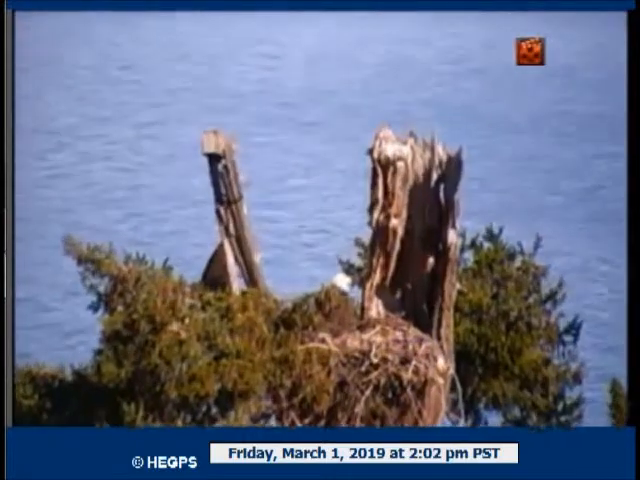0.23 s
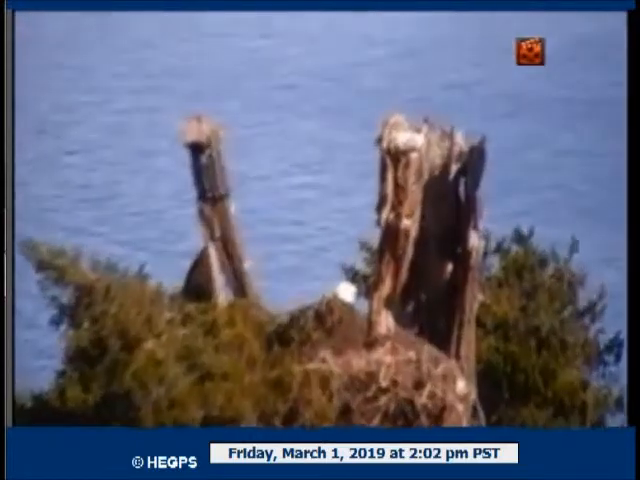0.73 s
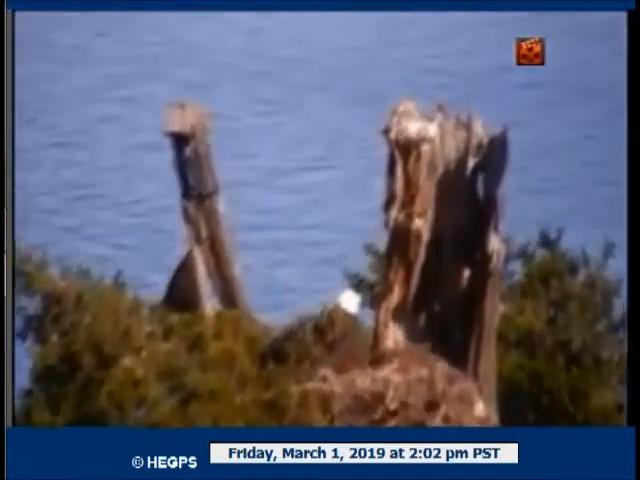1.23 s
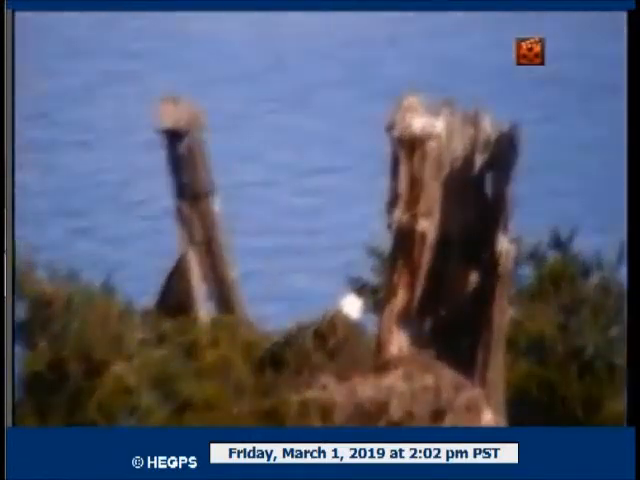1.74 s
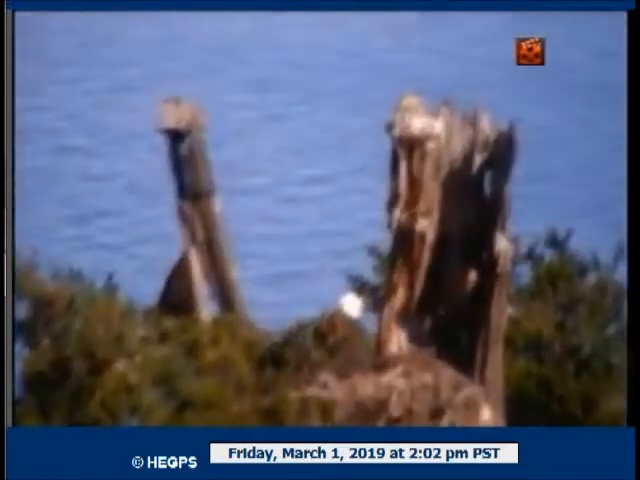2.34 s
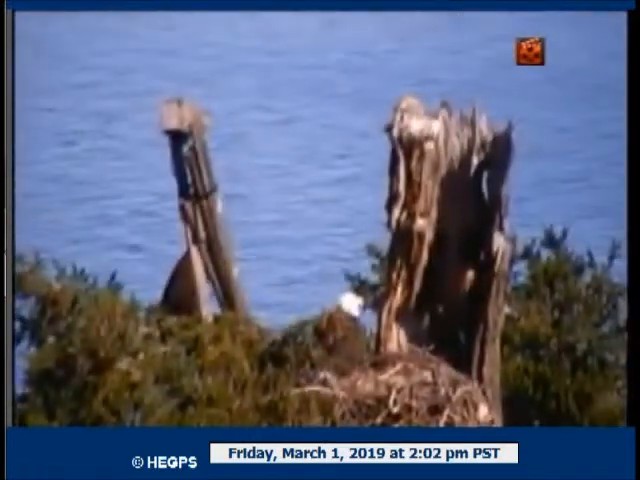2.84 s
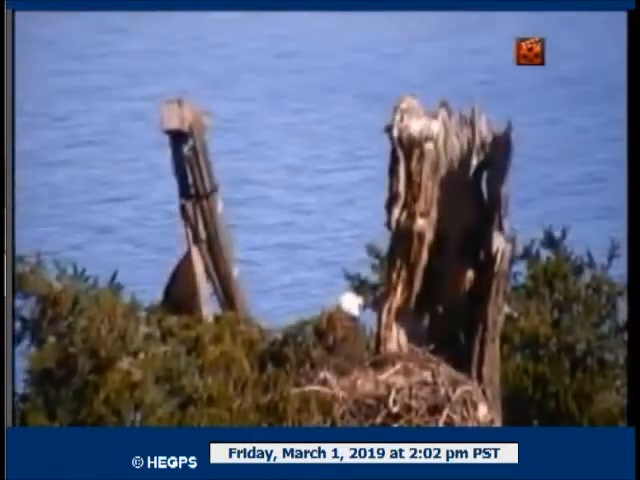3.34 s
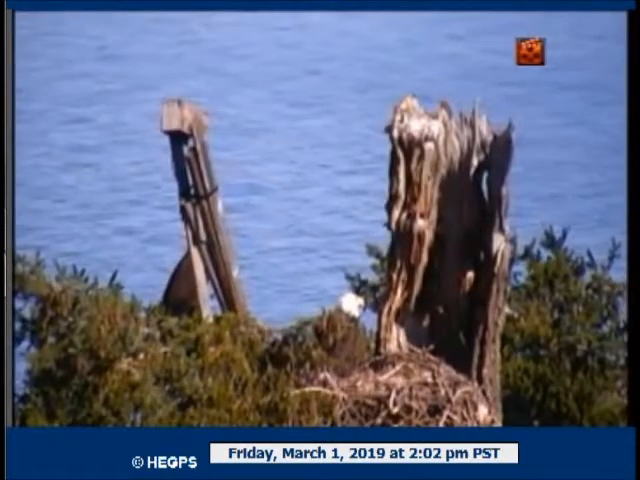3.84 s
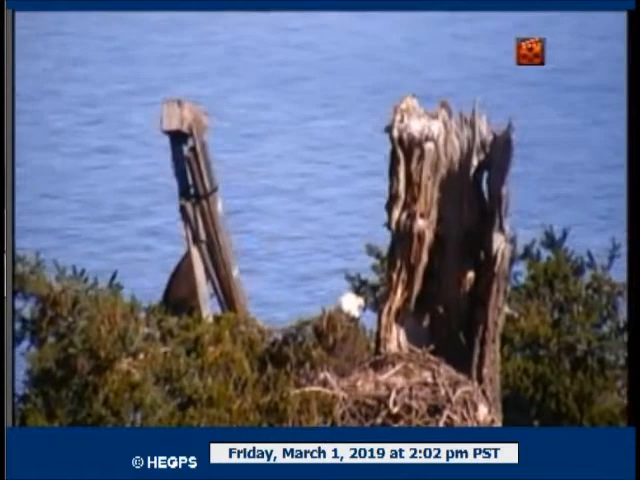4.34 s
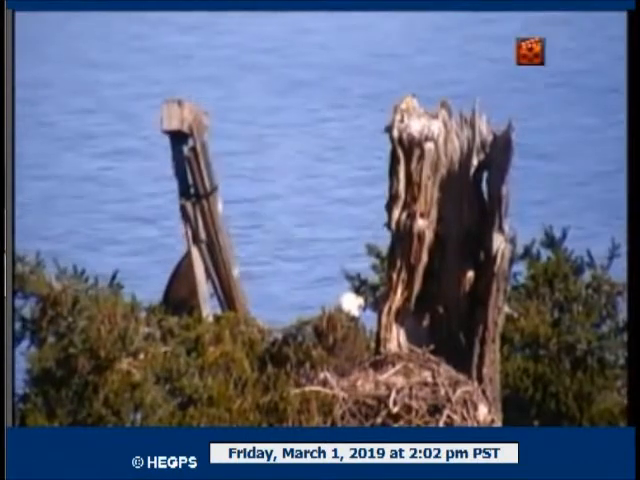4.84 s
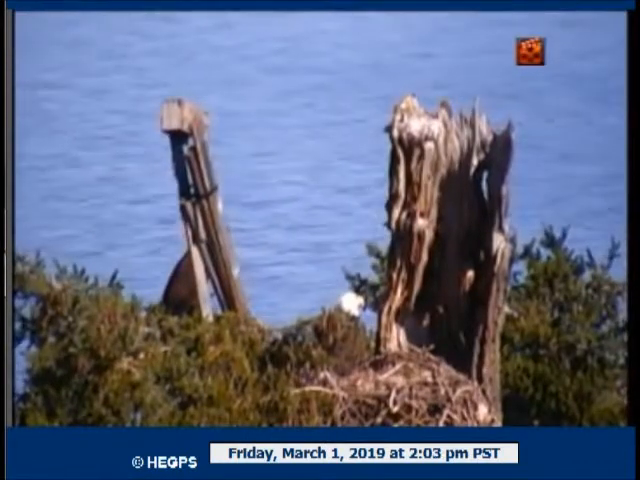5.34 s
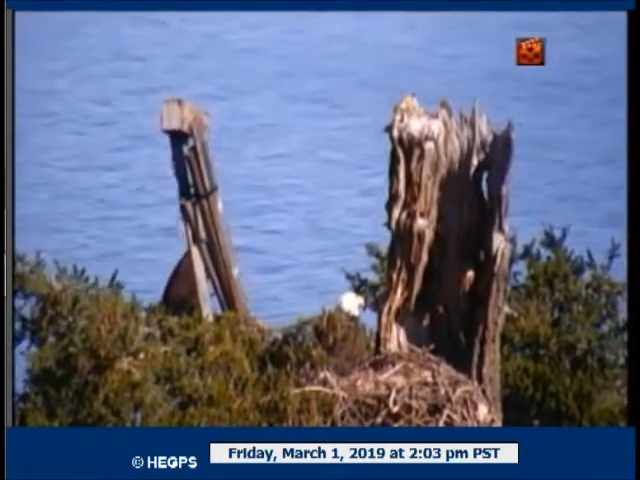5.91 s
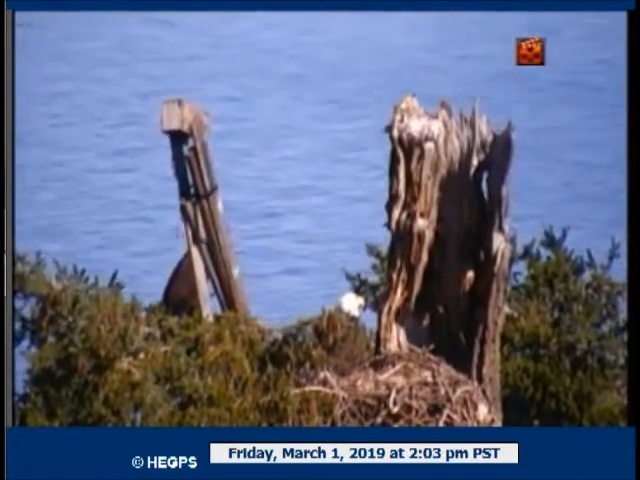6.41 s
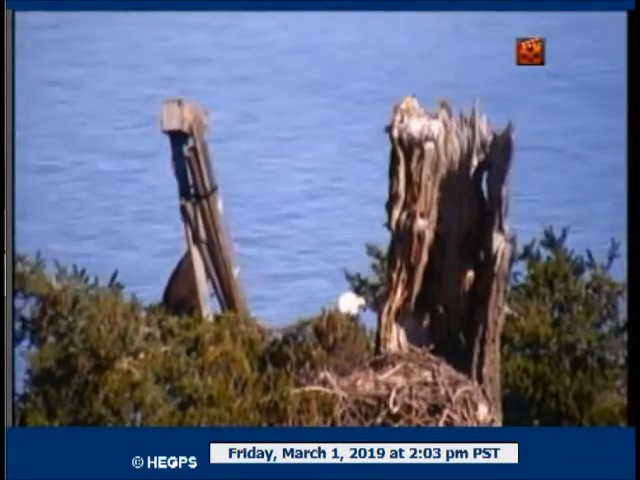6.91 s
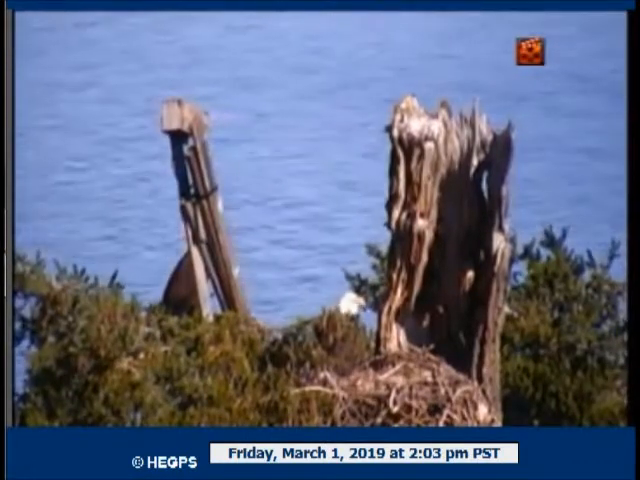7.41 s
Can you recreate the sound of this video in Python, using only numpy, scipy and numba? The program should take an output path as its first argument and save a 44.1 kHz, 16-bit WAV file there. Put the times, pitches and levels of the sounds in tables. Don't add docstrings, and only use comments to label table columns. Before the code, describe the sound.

Low wavering propeller hum, mains buzz and soft wind rumble outdoors, faint birds twittering, until a small engine sputters to life near the end.

```python
import sys
import numpy as np
from scipy import signal
from scipy.fft import rfft, irfft, next_fast_len
from scipy.io import wavfile
from numba import njit

SR = 44100
rng = np.random.default_rng(int(sys.argv[2]) if len(sys.argv) > 2 else 0)


def voltage_ratio(level):
    return 10 ** (np.asarray(level, float) / 20)


def generate_wav(sig):
    pcm = np.round(np.clip(np.atleast_2d(sig).T, -1, 1) * 32767).astype(np.int16)
    wavfile.write(sys.argv[1], SR, pcm)


N = 337806
T = np.arange(N) / SR


def in_time(rows):
    s, *columns = np.transpose(rows)
    return [np.interp(T, s, column) for column in columns]


def rms_one(x):
    return x / np.sqrt(np.mean(x ** 2) + 1e-20)


def drift(rate_hz):
    r = np.exp(-80 * np.pi * rate_hz / SR)
    white = rng.standard_normal(N // 40 + 2002)
    slow = signal.lfilter([1], [1, -2 * r, r * r], white)[2000:]
    return np.interp(np.arange(N) / 40, np.arange(len(slow)), rms_one(slow))


def smooth_step(at_s, width_s):
    return .5 + .5 * np.tanh((T - at_s) / width_s)


@njit
def resonate(x, hz, width_hz, sr):
    r = np.exp(-np.pi * width_hz / sr)
    out = np.zeros(len(x))
    for i in range(2, len(x)):
        drive = (1 - r * r) / 2 * (x[i] - x[i - 2])
        out[i] = drive + 2 * r * np.cos(2 * np.pi * hz[i] / sr) * out[i - 1] - r * r * out[i - 2]
    return out


def body(x, modes):
    out = np.zeros(len(x))
    for k, (hz, width_hz, db) in enumerate(modes):
        out += (-1) ** k * voltage_ratio(db) * resonate(x, np.full(len(x), float(hz)), width_hz, SR)
    return out


def butter(x, hz, kind, order):
    return signal.sosfilt(signal.butter(order, hz, kind, fs=SR, output="sos"), x)


def hisses():
    knee_hz, top_share = 5030, 0.67
    white = rng.standard_normal((3, N))
    return top_share * white + (1 - top_share) * butter(white, knee_hz, "low", order=1)


def buzz():
    mains_hz, first_edge_s, level_db = 59.984, .00557, -41
    turn = 2 * np.pi * mains_hz * (T - first_edge_s)
    sharp = -np.tanh(220.0 * np.sin(turn))
    soft = -.35 * np.tanh(25.0 * np.sin(turn + 1.086))
    return voltage_ratio(level_db) * butter(sharp + soft, 170, "high", order=2)


# f/Hz, level/dB [dB per Hz]
RUMBLE_SPECTRUM = [(13, -48), (22, -24), (46, -9.5), (85, -3), (103, -8.5), (140, 0), (172, 1), (199, -1),
                   (339, -13), (591, -20), (655, -21), (838, -54.5), (929, -24.5), (1100, -30.5),
                   (3000, -62), (3900, -92.5), (6600, -120)]
# t/s, level/dB
RUMBLE_SWELL = [(0, -34), (1, -33.5), (2, -35), (3, -33), (3.7, -32.5), (4.3, -31), (5, -35), (6, -32),
                (7.66, -35)]


def rumble():
    hz, level_db = np.transpose(RUMBLE_SPECTRUM)
    white = rng.standard_normal((2, N))
    edges = 22 * 2 ** np.arange(0, 7.4, 1 / 3)
    out = np.zeros(N)
    for k, (low, high) in enumerate(zip(edges, edges[1:])):
        band_db = np.interp(np.log(low * high) / 2, np.log(hz), level_db)
        swell_db = 0.39 * drift(0.93) + 1.83 * drift(6.0)
        out += voltage_ratio(band_db + swell_db) * butter(white[k % 2], [low, high], "band", order=2)
    return voltage_ratio(in_time(RUMBLE_SWELL)[0]) * rms_one(out)


# f/Hz, width/Hz, level/dB
HOLLOW_RING = (227.6, 12, -41)


def hollow():
    hz, width_hz, db = HOLLOW_RING
    ring = body(rng.standard_normal(N), [(hz, width_hz, 0)])
    return voltage_ratio(db + 2.7 * drift(0.28)) * rms_one(ring)


# multiple of the turning rate, level/dB
MOTOR_ORDERS = [(1, -31), (9, -57), (13, -59)]


def motor():
    turn = 2 * np.pi * 71.3 * T + 0.088 * drift(2.6)
    return sum(np.sqrt(2) * voltage_ratio(db) * np.sin(round(k) * turn) for k, db in MOTOR_ORDERS)


# t/s, length/s, first f/Hz, last f/Hz, level/dB
BIRD_CALLS = [(.69, .02, 8300, 7500, -69), (.82, .025, 8400, 7500, -70), (1.28, .05, 5000, 4500, -73),
              (2.15, .05, 4750, 5100, -73), (2.31, .14, 4380, 4350, -72.5), (2.43, .09, 4380, 4620, -72),
              (2.5, .04, 3900, 3500, -75), (2.54, .09, 4350, 4050, -68.5), (2.615, .055, 5800, 4850, -71.5),
              (2.66, .04, 4200, 4800, -75), (2.93, .06, 4800, 3900, -70.5), (3.0, .045, 5700, 4600, -73),
              (4.32, .06, 4700, 4250, -73), (4.694, .009, 2150, 1750, -57), (4.876, .009, 2400, 2000, -55),
              (4.934, .012, 2350, 1800, -60), (5.712, .016, 1030, 990, -54), (5.494, .012, 2200, 1600, -65)]


def birds():
    out = np.zeros(N)
    waver = 1 + 0.006 * drift(40)
    for start_s, length_s, first_hz, last_hz, db in BIRD_CALLS:
        start, count = round(start_s * SR), round(length_s * SR)
        hz = np.linspace(first_hz, last_hz, count) * waver[start:start + count]
        whistle = np.sin(2 * np.pi * np.cumsum(hz) / SR)
        out[start:start + count] += np.sqrt(2) * voltage_ratio(db) * np.hanning(count) ** 0.13 * whistle
    out *= voltage_ratio(2.5 * drift(60))
    return out + .4 * np.roll(out, round(.017 * SR))


# t/s, level/dB, extra path of the echo off the water/m
DRONE_PASS = [(0, -18, 1.26), (.6, -20.5, 1.326), (1.08, -18, 1.34), (1.5, -23.5, 1.195), (1.9, -21, 1.18),
              (2.2, -25, 0.95), (2.7, -27, 1), (3.1, -33.5, 1.34), (3.7, -25, 1.09), (4.0, -27.5, 1.34),
              (4.7, -22, 1.445), (5.4, -23, 1.21), (5.8, -23.5, 1.255), (6.5, -29, 1.4), (6.8, -30.5, 1.3),
              (7.07, -29, 1.78), (7.3, -32.5, 0.99), (7.66, -27.5, 1.06)]
# t/s, half width/s, level/dB
THIRD_SWELLS = [
    (1.55, 0.36, -40.5),
    (3.9, 1, -49.5),
    (7.2, 0.49, -51),
]


def propeller():
    blade_hz, doppler_hz, abeam_s, pass_s = 94.5, 1.75, 2.8, 3.0
    water_echo, sound_m_per_s = .85, 343
    hz = blade_hz - doppler_hz * np.tanh((T - abeam_s) / pass_s)
    level_db, extra_m = in_time(DRONE_PASS)
    lag = 2 * np.pi * hz * extra_m / sound_m_per_s

    gains = []
    for k in (1, 2):
        comb = np.abs(1 + water_echo * np.exp(1j * k * lag)) / (1 + water_echo)
        gains.append(voltage_ratio(level_db) * comb)
    third = voltage_ratio(-60.5)
    for s, width_s, db in THIRD_SWELLS:
        third = third + voltage_ratio(db) * np.exp(-((T - s) / width_s) ** 2)
    gains.append(third)

    turn = 2 * np.pi * np.cumsum(hz) / SR
    out = np.zeros(N)
    for k, gain in enumerate(gains, 1):
        flutter = voltage_ratio(1.01 * k * drift(3.15))
        out += np.sqrt(2) * gain * flutter * np.sin(k * turn + 0.33 * k * drift(3.0))
    return out


# t/s, turns done; a whole number is a firing
CRANK_TURNS = [
    (6.07, -.55),
    (6.102, 0),
    (6.165, 1),
    (6.208, 2),
    (6.331, 5),
    (6.402, 7),
    (6.459, 9),
    (7.053, 31),
    (7.66, 53.6),
]
FIRING_ACCENTS = {0: 6, 1: 1.5, 2: 2, 7: -3, 22: 2.5, 29: 3, 31: 3.5, 37: 2, 40: 2, 42: 3.5, 44: 5.5, 47: 3,
                  52: 3}


def firings(start):
    half_turns = 2 * in_time(CRANK_TURNS)[0][start:]
    at = np.flatnonzero(np.diff(np.floor(half_turns)))
    turns_per_s = np.gradient(half_turns)[at] * SR / 2
    half = np.floor(half_turns[at + 1])
    accent_db = np.array([FIRING_ACCENTS.get(h / 2, 0) for h in half])
    knock_db = half % 2 * (-21 + .55 * turns_per_s)
    pulses = np.zeros(len(half_turns) + 30)
    late = rng.integers(0, 30, len(at))
    pulses[at + late] = voltage_ratio(knock_db + accent_db + 1.2 * rng.standard_normal(len(at)))
    return pulses[:-30]


# t/s, level/dB
ENGINE_LOAD = [(6.07, -35), (6.1, -40.5), (6.17, -34), (6.36, -32.5), (6.62, -38), (6.95, -37.5),
               (7.1, -39), (7.41, -38.5), (7.66, -37)]


def running():
    cold_db, run_db = 7.5, 1.5
    filled = smooth_step(6.245, .015) - smooth_step(6.44, 0.032)
    pipe_db = run_db + (cold_db - run_db) * filled
    peak_s, peak_db, rise_db_per_s, rest_db, settle_s = 6.66, 9, 15, -3, 0.54
    since = T - peak_s
    settling = (peak_db - rest_db) * (np.exp(-np.maximum(since, 0) / settle_s) - 1)
    valve_db = peak_db + rise_db_per_s * np.minimum(since, 0) + settling
    seated = smooth_step(7.05, .18)
    cowl_hz, cowl_db = 1035 + 130 * seated, 1.5 * seated
    return in_time(ENGINE_LOAD)[0], pipe_db, valve_db, cowl_hz, cowl_db


# f/Hz, width/Hz, level/dB
SILENCER = [(224.8, 22, 5.5), (258, 22, 2.5), (320, 27, -12.5), (667, 282, -9.5)]
EXHAUST_PIPE = [(369, 18, -3), (492.6, 12, 3), (551, 33, -3)]
ENGINE_CASING = [(945, 31, 1.5), (1533, 78, -10), (1687, 74, -8.5), (1980, 63, -12.5)]
COOLING_FINS = [(1450, 240, -17), (2100, 305, -15)]
VALVE_GEAR = [(2820, 700, -27.5), (3670, 490, -28), (4880, 2100, -36)]


def engine():
    start = round(CRANK_TURNS[0][0] * SR)
    load_db, pipe_db, valve_db, cowl_hz, cowl_db = (curve[start:] for curve in running())
    pulses = firings(start)
    count = len(pulses)
    n = np.arange(1500)
    fall = np.exp(-n / (.007 * SR)) - np.exp(-n / (.002 * SR))
    puffs = signal.fftconvolve(pulses, fall)[:count]
    rush, clatter = (puffs + np.array([[.1], [.35]])) * rng.standard_normal((2, count))
    clatter = rms_one(clatter)
    rattle = signal.fftconvolve(pulses, fall * rng.standard_normal(len(fall)))[:count]
    thump = butter(pulses, 2200, "low", order=2)
    drive = rms_one(rush) + .35 * rms_one(rattle) + .35 * rms_one(thump)

    tone = voltage_ratio(3.0) * body(drive, SILENCER)
    tone += voltage_ratio(pipe_db + 3) * body(drive, EXHAUST_PIPE)
    tone += voltage_ratio(cowl_db - 0.5) * resonate(drive, cowl_hz, 98, SR)
    tone += body(drive, ENGINE_CASING)
    tone += body(clatter, COOLING_FINS)
    tone += voltage_ratio(valve_db) * body(clatter, VALVE_GEAR)
    tone = .25 * tone + .75 * signal.lfilter(*signal.iirnotch(850, 8, SR), tone)

    out = np.zeros(N)
    out[start:] = voltage_ratio(load_db + 17.5) * tone
    for lag_s, db in ((.009, -10.5), (.047, -11), (.11, -11)):
        lag = round(lag_s * SR)
        out[lag:] += voltage_ratio(db) * butter(out[:-lag], 6500, "low", order=1)
    return out


def scene():
    right_lag = 2.73
    hiss = hisses()
    mono = voltage_ratio(-51) * hiss[0] + buzz() + rumble() + hollow() + motor()
    mono += voltage_ratio(6.0) * birds() + propeller() + engine()
    size = next_fast_len(N + 64)
    delay = np.exp(-2j * np.pi * right_lag * np.arange(size // 2 + 1) / size)
    late = irfft(rfft(mono, size) * delay, size)[:N]
    return np.array([mono * voltage_ratio(-2.8), late * voltage_ratio(-3.0)]) + voltage_ratio(-63) * hiss[1:]


def low_pass(x):
    return signal.sosfilt(signal.butter(12, 11830, fs=SR, output="sos"), x)


def record(dry):
    mix = dry - .0002
    return low_pass(mix)


dry = scene()
out = record(dry)
generate_wav(out)
```